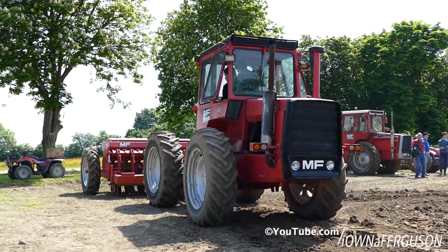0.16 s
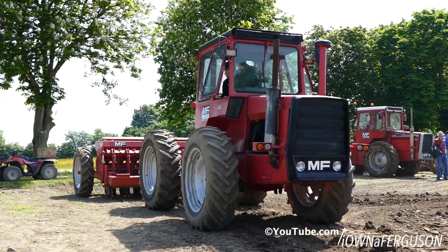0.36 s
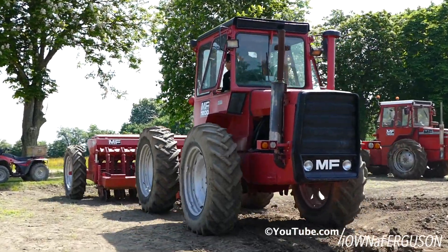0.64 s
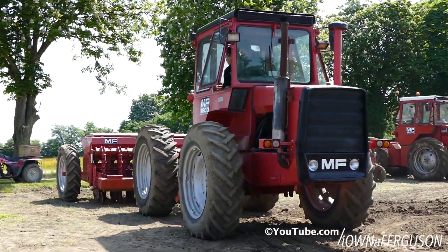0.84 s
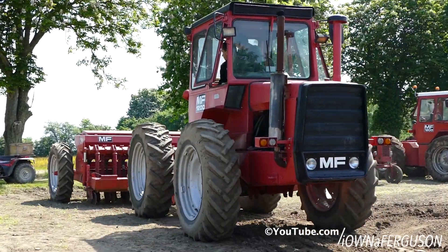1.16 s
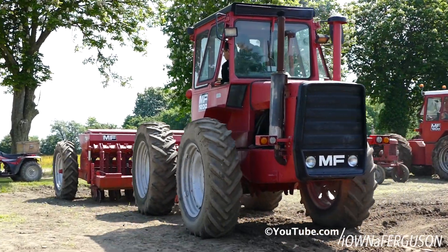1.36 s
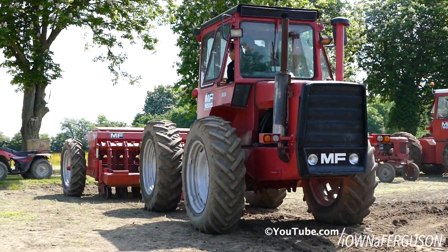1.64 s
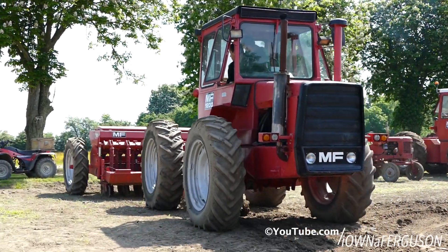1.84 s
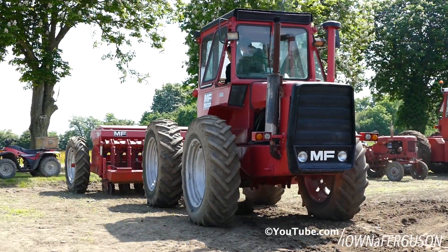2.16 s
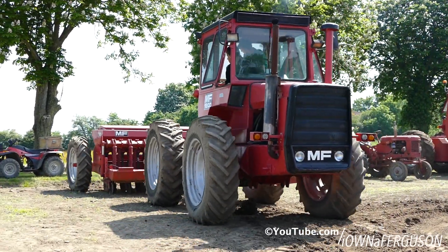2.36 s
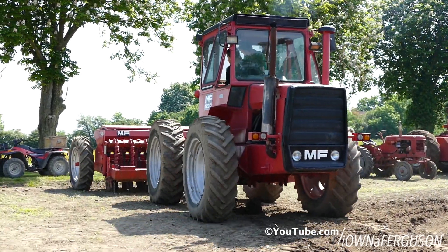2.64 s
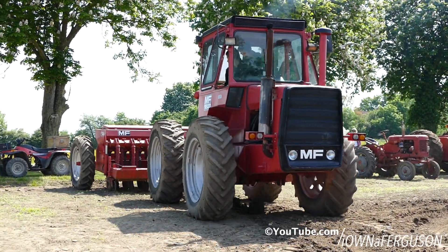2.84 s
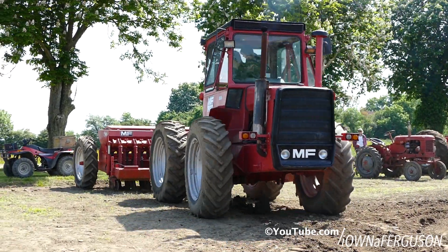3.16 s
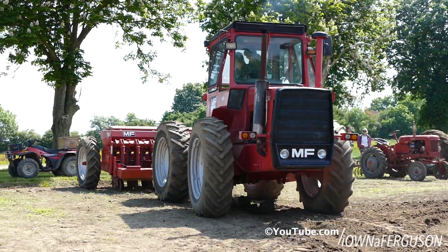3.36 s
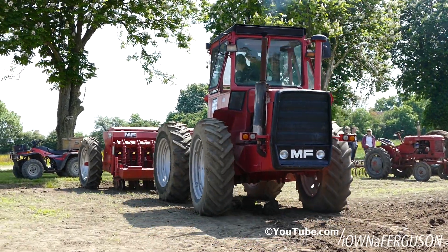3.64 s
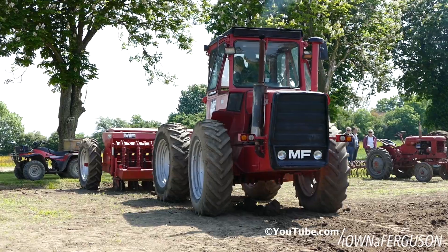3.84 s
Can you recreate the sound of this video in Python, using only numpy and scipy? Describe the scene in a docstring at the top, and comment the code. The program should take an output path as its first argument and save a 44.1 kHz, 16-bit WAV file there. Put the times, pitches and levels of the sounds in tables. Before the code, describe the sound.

A diesel tractor engine clatters steadily and slowly nears while wind buffets the microphone.

```python
"""Wind rumbles on the microphone while a six-cylinder diesel tractor clatters across a field.
The tractor rolls slowly closer at steady revs, squeaking, its fan humming: knocks, ringing panels, tones.
Wind is shaped noise with puffs of hiss; its buffets are pressure dips that overload the microphone
and duck the gain. A bird gives one short, high chirp: a gliding, slightly rough whistle with overtones."""
import sys
import numpy as np
from scipy import signal
from scipy.fft import rfft, irfft
from scipy.io import wavfile
from scipy.ndimage import uniform_filter1d

SR = 44100
rng = np.random.default_rng(int(sys.argv[2]) if len(sys.argv) > 2 else 0)


def wrap_up_sound(samples):
    """Save the sound to the file named by the first command line argument, as 16-bit audio."""
    columns = np.atleast_2d(samples).T
    # keep every value between -1 and 1, then stretch to whole-number steps
    tamed = np.clip(columns, -1, 1)
    steps = np.round(tamed * 32767).astype(np.int16)
    wavfile.write(sys.argv[1], SR, steps)


N = 176400
TIME = np.arange(N) / SR

# wind rumble at the microphone: start_s [s], level_db [dB]
RUMBLE_LEVEL = [(0, -13), (.25, -18.5), (.5, -15), (.7, -16.5), (1.05, -16), (1.25, -17.5), (1.5, -12.5),
                (1.75, -22.5), (1.88, -31), (2.05, -24.5), (2.25, -16.5), (2.4, -22), (2.65, -20),
                (2.9, -23), (3.15, -18), (3.45, -20), (3.65, -24.5), (3.85, -11.5), (4, -23.5)]
# colour of the rumble: frequency_hz [Hz], density_db [dB per Hz]
RUMBLE_COLOUR = [(8, 3.5), (18, 9), (30, -7), (50, -8.5), (75, -17), (110, -35.5), (200, -31.5),
                 (500, -81.5)]
# finer turbulence in the gusts: start_s [s], level_db [dB]
GUST_LEVEL = [(0, -24.5), (.2, -29.5), (.42, -19), (.56, -22.5), (.68, -25.5), (1, -23), (1.25, -33),
              (1.45, -32), (1.75, -54), (2.2, -38), (2.9, -44), (3.35, -32), (3.6, -33), (4, -39.5)]
# colour of the turbulence: frequency_hz [Hz], density_db [dB per Hz]
GUST_COLOUR = [(25, -21), (55, 9), (92, 1), (155, -8), (300, -19), (700, -28), (2000, -69), (6000, -87)]
LUMPY_DB = 1   # spread of the wind's unevenness

# bands of a knock's thud, clack, rattle and tick: low_hz [Hz], high_hz [Hz]
KNOCK_BANDS = [(300, 1000), (1000, 2000), (2000, 3800), (3800, 12000)]
# drive of each cylinder's knock, in firing order, before its bands are filtered out:
# thud_db, clack_db, rattle_db, tick_db [dB over the steady rush]
CYLINDERS = [(-1, -2, 0, 0.5), (-9.5, -10, 4, 1.5), (1.5, 3.5, 2, 2), (-1, -5, -7, -11),
             (0, 2.5, -3.5, 2.5), (-2.5, 0.5, -1, -7)]
# level of the engine as heard, with gain recovery and wind hiss, rising as it nears:
# start_s [s], level_db [dB]
ENGINE_LEVEL = [(0, -39.5), (.2, -34.5), (.42, -32), (.56, -35), (.62, -38), (.72, -36.5), (.92, -37.5),
                (1.1, -38), (1.5, -36.5), (2, -33), (2.5, -31.5), (3, -29), (3.55, -28), (3.78, -28),
                (3.87, -30.5), (4, -28.5)]
# filter that colours the clatter: frequency_hz [Hz], gain_db [dB, only the shape counts]
CLATTER_COLOUR = [(40, 13), (110, -3), (200, 1.5), (250, -2), (420, 1.5), (650, -0.5), (900, 0.5),
                  (1000, -5), (1550, -5.5), (1900, -10.5), (2450, -9.5), (2900, -15.5), (3500, -14),
                  (4500, -23.5), (5200, -23), (6000, -33), (7600, -37), (9000, -37.5), (12000, -42),
                  (15500, -51)]
# ringing of block and panels: pitch_hz [Hz], width_hz [Hz],
# level_db [dB gain on the blows, halfway through], growth_db_per_s [dB per s]
PANELS = [(299, 37, -16.5, 5.5), (542, 88, -2.5, -2), (843.4, 17, -1.5, 1), (1083.5, 14, 5.5, 1),
          (1350, 26, 0, -1), (2197, 32, -0.5, -2.5), (3150, 65, -0.5, -1), (3420, 100, -11, -3.5),
          (4190, 67, 3.5, 0), (4390, 60, 5, 2), (4630, 25, -2, -1), (6720, 230, 3.5, 0)]
# exhaust tones: order [multiple of the cycle rate]
EXHAUST_ORDERS = [6, 7, 9, 12, 20, 21, 30, 42]
# level of each exhaust tone, halfway through: level_db [dB relative to the clatter]
EXHAUST_DB = [-13, -21.5, -16.5, -21, -26.5, -20, -25.5, -41]
# hum of fan and drives: pitch_hz [Hz], level_db [dB relative to the clatter, halfway through]
HUMS = [(183, -12.5), (312, -21), (366, -26.5)]

# buffets on the microphone: centre_s [s], peak_db [dB before the port leak], width_s [s to 1/e]
BUFFETS = [(0.061, 2.5, 0.0058), (0.123, -2, 0.0073), (0.4, -1.5, 0.0089), (0.505, -1.5, 0.004),
           (0.566, 11.5, 0.01), (0.646, -3, 0.0064), (0.806, -3, .005), (0.774, 1, 0.0069),
           (0.962, -0.5, 0.0042), (1.018, -1.5, 0.0098), (1.181, 2, 0.0072), (1.298, -8, 0.011),
           (1.428, -5, 0.0071), (1.488, -10, 0.014), (1.728, -2.5, 0.025), (2.233, -7, 0.022),
           (2.515, -8, 0.0074), (2.692, -6.5, 0.012), (3.135, -4, 0.0066), (3.292, -10, 0.0048),
           (3.37, -7.5, 0.0038), (3.458, -5.5, 0.0079), (3.785, 3.5, 0.016), (3.894, -10, .011)]
# colour of the rush of air in a buffet: frequency_hz [Hz], density_db [dB per Hz]
PUFF_COLOUR = [(100, -3), (400, 5), (1200, -10.5), (3500, -15.5), (6000, -30), (15000, -45)]
# brief puffs of wind hiss and chuffs at the start, then squeaks and scrapes of the machine:
# centre_s [s], level_db [dB before the treble cut], length_s [s to 1/e, each side],
# pitch_hz [Hz], width_hz [Hz]
CHUFFS_AND_SQUEAKS = [(0.068, -44, 0.012, 1200, 2560), (0.145, -43, 0.018, 1200, 2540),
                      (.755, -46, 0.019, 1300, 2560), (0.918, -43, .026, 1500, 2130),
                      (3.402, -42, 0.029, 3550, 250), (3.697, -36, .012, 1380, 150),
                      (3.79, -47, 0.015, 3120, 250), (3.793, -35.5, 0.0092, 1430, 200)]
# ticks of the overloaded microphone: start_s [s], peak_db [dB]
TICKS = [(.556, -36), (.578, -30), (.62, -32), (.65, -33), (1.179, -36), (1.211, -40)]
# the chirp: start_s [s], pitch_hz [Hz], level_db [dB], overtones_db [dB, second partial]
CHIRP = [(2.885, 4040, -56, -75), (2.911, 4020, -31, -60), (2.921, 4220, -52, -76), (2.938, 4220, -47, -74),
         (2.955, 4200, -37.5, -75), (2.966, 4200, -50, -62), (2.975, 4030, -41, -55),
         (2.987, 4040, -40, -69), (3.0, 4100, -45, -62), (3.02, 3980, -48, -72), (3.045, 4170, -62, -82)]

CYCLE_HZ = 9.775   # four-stroke cycles per second
SPEED_WANDER, FIRST_FIRING_S = .002, 0.0078   # share of the speed; time of the first knock
KNOCK_S, KNOCK_SCATTER_DB = 0.01, 2   # decay to 1/e; spread from firing to firing
GRIT_DB, GRIT_SAMPLES = 5, 24   # tiny impacts: up to this much stronger or 1.4 times this weaker; length
GEAR_ORDER, GEAR_DEPTH = 20, 0.058   # teeth meshing per cycle; how deeply they chop the blows
REPEAT_SHARE = 0.15   # share of the steady rush's power that is the same in every cycle
PANEL_WAVER_DB, HUM_WAVER_DB = 0.9, 1.5   # each ringing and each tone comes and goes
DRONE_FADE_DB_PER_S = 0.5   # the tones grow less than the clatter as the tractor nears
SWAY_DB, FLUTTER_DB = .5, 0.27   # slow and fast unsteadiness of the engine's level
FINE_MODES_DB = 1.76   # many small modes of the sheet metal ripple the treble
FINE_MODE_SPACING_HZ, FINE_MODES_FROM_HZ = 69.75, 1700
BRIGHTEN_DB_PER_S, BRIGHT_HZ = 0.33, 4930   # the treble grows as the tractor comes nearer

PORT_LOW_HZ = 7.5   # the microphone lets slower pressure changes leak away
PUFF_DB = -36   # rush of air at full strength, which strong buffets approach
SQUEAK_TOP_HZ = 4200   # chuffs, squeaks and scrapes fade above this
TICK_HZ = 1500   # a tick's spectrum falls above this
THIRD_PARTIAL_DB = -3   # relative to the second
CHIRP_ROUGH = 0.0057   # jitter, share of the pitch
CHIRP_ECHO_S, CHIRP_ECHO_DB = 0.0217, -21   # one faint echo of the chirp

CEILING, CUTOFF_HZ = 0.93, 15700   # overload level, full scale 1; top of the recorder's range
GAIN_THRESHOLD_DB, GAIN_RELEASE_DB_PER_S = 1, 81
GAIN_LAG_S, GAIN_ATTACK_S = 0.0215, 0.0055   # the gain control reacts late, then smoothly


def from_db(db):
    """Decibels to gain."""
    return 10 ** (np.asarray(db) / 20)


def rms_one(x):
    """Scale to rms 1."""
    return x / np.sqrt(np.mean(x ** 2) + 1e-20)


def in_time(rows):
    """Each column of a curve at every sample."""
    start_s, *columns = np.transpose(rows)
    return [np.interp(TIME, start_s, column) for column in columns]


def drift(rate):
    """Smooth chance at about this many turns a second; spread 1."""
    step = 40   # computed at every 40th sample, then joined by straight lines
    r = np.exp(-2 * step * np.pi * rate / SR)
    chance = rng.standard_normal(N // step + 2002)
    slow = signal.lfilter([1], [1, -2 * r, r * r], chance)[2000:]   # drop the run-in
    return np.interp(np.arange(N) / step, np.arange(len(slow)), rms_one(slow))


def coloured(x, spectrum):
    """Filter a sound by a curve of gain over log frequency; rms 1."""
    hz, db = np.transpose(spectrum)
    bins = np.maximum(np.arange(N // 2 + 1) * SR / N, 1)
    gain = from_db(np.interp(np.log(bins), np.log(hz), db))
    return rms_one(irfft(rfft(x) * gain, N))


def resonance(x, hz, width_hz):
    """One two-pole resonance, gain 1 on top."""
    r = np.exp(-np.pi * width_hz / SR)
    zeros = np.array([1, 0, -1]) * (1 - r * r) / 2
    poles = [1, -2 * r * np.cos(2 * np.pi * hz / SR), r * r]
    return signal.lfilter(zeros, poles, x)


def wind_noise(curve, spectrum):
    """Lumpy pressure noise at the microphone that follows a level curve."""
    level_db, = in_time(curve)
    noise = coloured(rng.standard_normal(N), spectrum)
    evened = noise / np.sqrt(uniform_filter1d(noise ** 2, size=6000) + 1e-9)
    lumpy = rms_one(evened * from_db(LUMPY_DB * drift(14)))
    return from_db(level_db) * lumpy


def clatter(cycles):
    """Each firing is a gritty knock of its cylinder's colour over a steady rush; block and panels ring."""
    count = len(CYLINDERS)
    firing, since = np.divmod((cycles - FIRST_FIRING_S * CYCLE_HZ) * count, 1)
    firing = firing.astype(int)
    strength = from_db(KNOCK_SCATTER_DB * rng.standard_normal(size=1000)[firing])
    knock = strength * np.exp(-since / (count * CYCLE_HZ * KNOCK_S))

    impact_db = GRIT_DB * np.repeat(rng.uniform(-1.4, 1, N), GRIT_SAMPLES)[:N]
    grit = rms_one(rng.standard_normal(N) * from_db(impact_db))

    place_in_cycle = (cycles % 1 * SR / CYCLE_HZ).astype(int)
    same = rng.standard_normal(N)[place_in_cycle]
    blows = np.sqrt(REPEAT_SHARE) * same + np.sqrt(1 - REPEAT_SHARE) * rng.standard_normal(N)
    for band, db in zip(KNOCK_BANDS, np.transpose(CYLINDERS)):
        band_filter = signal.butter(2, band, "band", fs=SR, output="sos")
        blows = blows + signal.sosfilt(band_filter, grit * knock * from_db(db)[firing % count])
    blows = blows * (1 + GEAR_DEPTH * np.cos(2 * np.pi * GEAR_ORDER * cycles))

    rings = 0
    for hz, width_hz, db, growth in PANELS:
        ring_db = db + growth * (TIME - TIME.mean()) + PANEL_WAVER_DB * drift(10)
        rings = rings + from_db(ring_db) * resonance(blows, hz, width_hz)
    return coloured(blows + rings, CLATTER_COLOUR)


def rippled(x):
    """A dense set of small modes lifts some treble frequencies and leaves dips between them."""
    bins = np.arange(N // 2 + 1) * SR / N
    ripple = np.interp(bins / FINE_MODE_SPACING_HZ, np.arange(2000), rng.standard_normal(size=2000))
    treble_share = bins ** 2 / (bins ** 2 + FINE_MODES_FROM_HZ ** 2)
    return rms_one(irfft(rfft(x) * from_db(FINE_MODES_DB * ripple * treble_share), N))


def tractor():
    """Clatter, exhaust orders and fan hum all follow one crankshaft; nearer is louder and brighter."""
    cycles = np.cumsum(CYCLE_HZ * (1 + SPEED_WANDER * drift(1.5))) / SR
    from_middle_s = TIME - TIME.mean()

    tones = list(zip(EXHAUST_ORDERS, EXHAUST_DB)) + [(hz / CYCLE_HZ, db) for hz, db in HUMS]
    drone = 0
    for order, db in tones:
        tone = from_db(HUM_WAVER_DB * drift(2.5)) * np.sin(2 * np.pi * order * cycles)
        drone = drone + from_db(db) * rms_one(tone)
    drone = drone * from_db(-DRONE_FADE_DB_PER_S * from_middle_s)

    rattle = rippled(clatter(cycles))
    treble_filter = signal.butter(1, BRIGHT_HZ, "high", fs=SR, output="sos")
    treble = signal.sosfiltfilt(treble_filter, rattle)
    rattle = rattle + treble * (from_db(BRIGHTEN_DB_PER_S * from_middle_s) - 1)

    level_db, = in_time(ENGINE_LEVEL)
    unsteady_db = SWAY_DB * drift(11.5) + FLUTTER_DB * drift(22)
    return from_db(level_db + unsteady_db) * (rattle + drone)


def buffets():
    """Each eddy sucks briefly at the microphone port with a puff of air, and the pressure swings back."""
    suction = sum(from_db(db) * np.exp(-((TIME - s) / width) ** 2) for s, db, width in BUFFETS)
    puffs = from_db(PUFF_DB) * np.tanh(suction) * coloured(rng.standard_normal(N), PUFF_COLOUR)
    leak = signal.butter(1, PORT_LOW_HZ, "high", fs=SR, output="sos")
    return puffs - signal.sosfilt(leak, suction)


def chuffs_and_squeaks():
    """Broad puffs of hiss and chuffs, later squeaks and scrapes: noise through a doubled resonance."""
    bursts = 0
    for s, db, length, hz, width_hz in CHUFFS_AND_SQUEAKS:
        once = resonance(rng.standard_normal(N), hz, width_hz)
        burst = rms_one(resonance(once, hz, width_hz))
        bursts = bursts + from_db(db) * np.exp(-((TIME - s) / length) ** 2) * burst
    return signal.sosfilt(signal.butter(2, SQUEAK_TOP_HZ, fs=SR, output="sos"), bursts)


def ticks():
    """The overloaded microphone ticks sharply: single impulses that decay exponentially."""
    clicks = np.zeros(N)
    for s, db in TICKS:
        clicks[int(s * SR)] = from_db(db)
    r = np.exp(-2 * np.pi * TICK_HZ / SR)
    return signal.lfilter([1], [1, -r], clicks + 1e-18)   # the offset avoids vanishingly small numbers


def bird():
    """A slightly rough whistle steps up and back down; overtones flare at the step down; one echo."""
    hz, db, overtones_db = in_time(CHIRP)
    phase = 2 * np.pi * np.cumsum(hz * (1 + CHIRP_ROUGH * drift(120))) / SR
    sounding = (TIME > CHIRP[0][0]) & (TIME < CHIRP[-1][0])
    overtones = np.sin(2 * phase) + from_db(THIRD_PARTIAL_DB) * np.sin(3 * phase)
    whistle = from_db(db) * np.sin(phase) + from_db(overtones_db) * overtones
    call = sounding * np.sqrt(2) * whistle   # levels are rms
    return call + from_db(CHIRP_ECHO_DB) * np.interp(TIME - CHIRP_ECHO_S, TIME, call)


def scene():
    """Wind, tractor and bird at one microphone."""
    wind = wind_noise(RUMBLE_LEVEL, RUMBLE_COLOUR) + wind_noise(GUST_LEVEL, GUST_COLOUR)
    mix = wind + tractor() + buffets() + chuffs_and_squeaks() + ticks() + bird()
    return mix[None]


def record(dry):
    """Gain control ducks just after big pressure swings; the input stage squashes them; the top is cut."""
    over_db = np.maximum(20 * np.log10(np.abs(dry[0]) + 1e-9) - GAIN_THRESHOLD_DB, 0)
    fall_db = GAIN_RELEASE_DB_PER_S * TIME
    held_db = np.maximum.accumulate(over_db + fall_db) - fall_db   # peaks held, then released steadily
    r = np.exp(-1 / (GAIN_ATTACK_S * SR))
    smooth_db = signal.lfilter([1 - r], [1, -r], held_db)
    duck_db = np.interp(TIME - GAIN_LAG_S, TIME, smooth_db)
    ducked = dry * from_db(-duck_db)

    # only the swing below 200 Hz is squashed; the rest rides on it until it clips
    swing = signal.sosfiltfilt(signal.butter(2, 200, fs=SR, output="sos"), ducked)
    squashed = swing / (1 + (swing / CEILING) ** 8) ** (1 / 8)
    clipped = np.clip(ducked - swing + squashed, -CEILING, CEILING)
    return signal.sosfilt(signal.ellip(10, .1, 80, CUTOFF_HZ, fs=SR, output="sos"), clipped)


dry = scene()
out = record(dry)
wrap_up_sound(out)
```